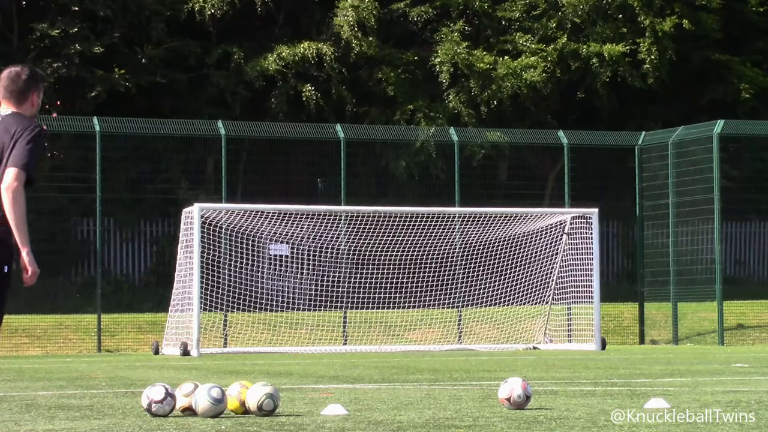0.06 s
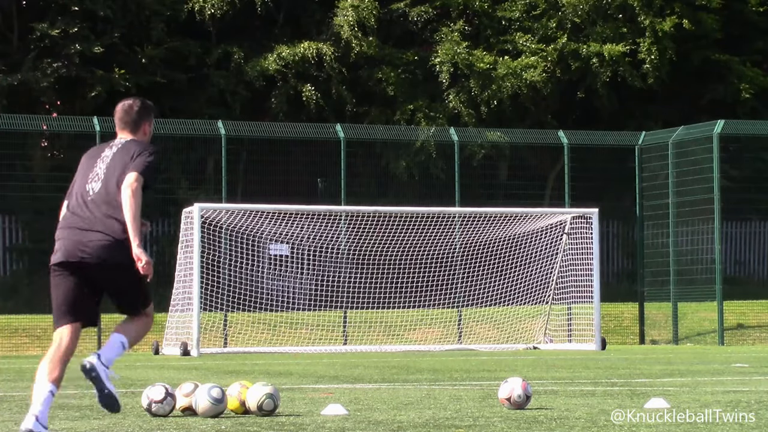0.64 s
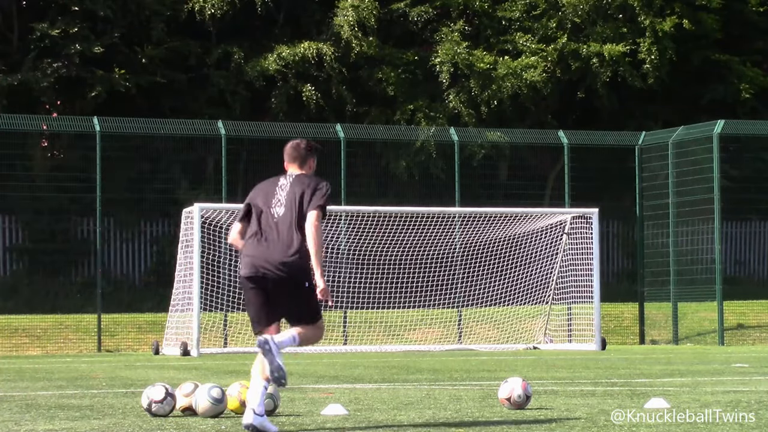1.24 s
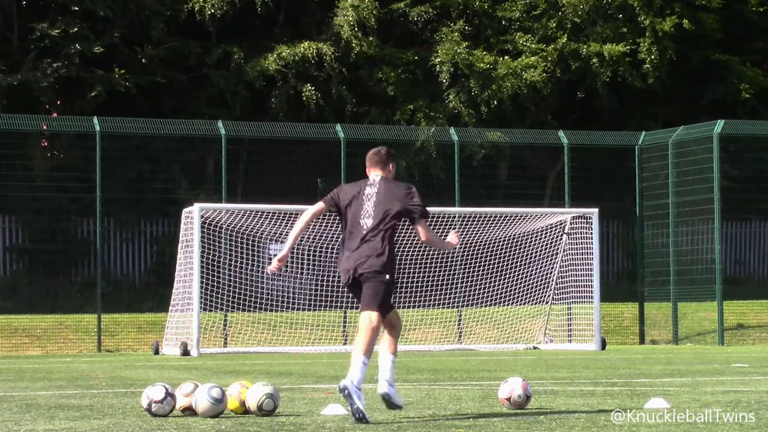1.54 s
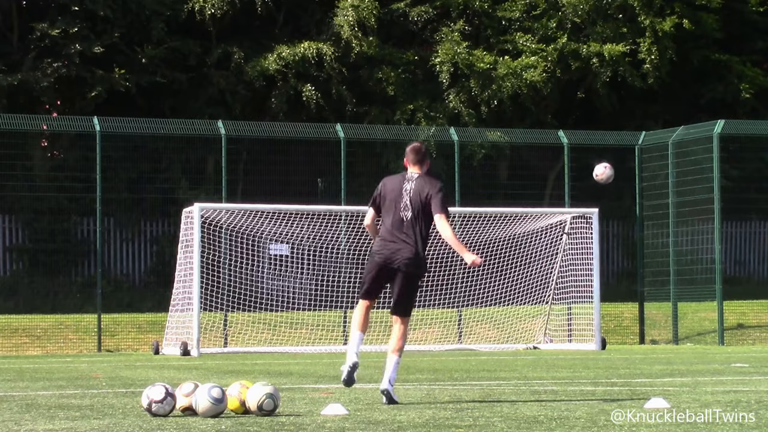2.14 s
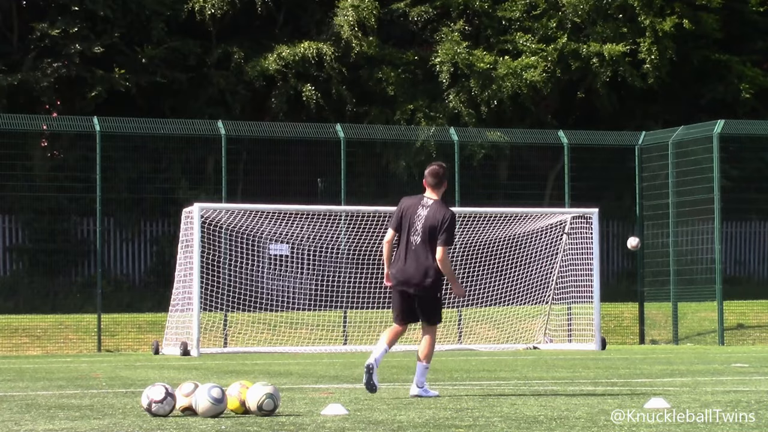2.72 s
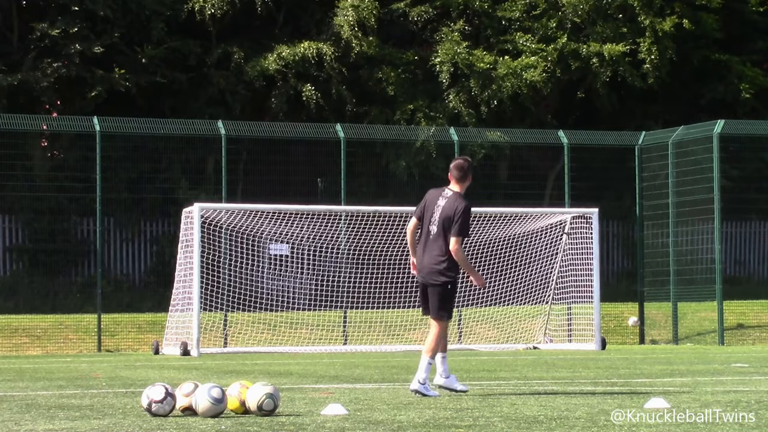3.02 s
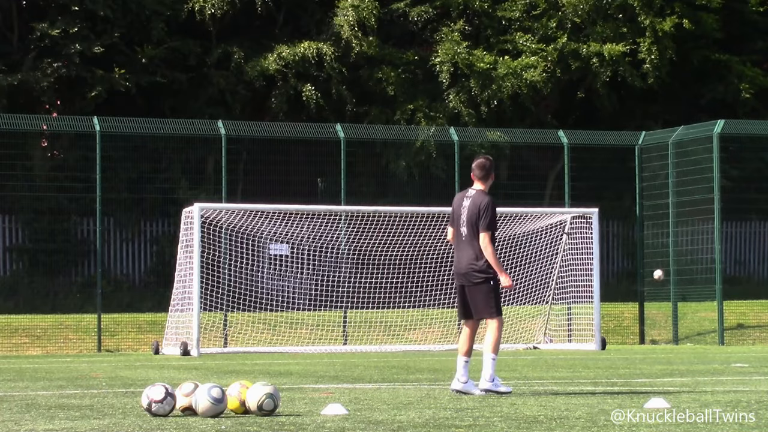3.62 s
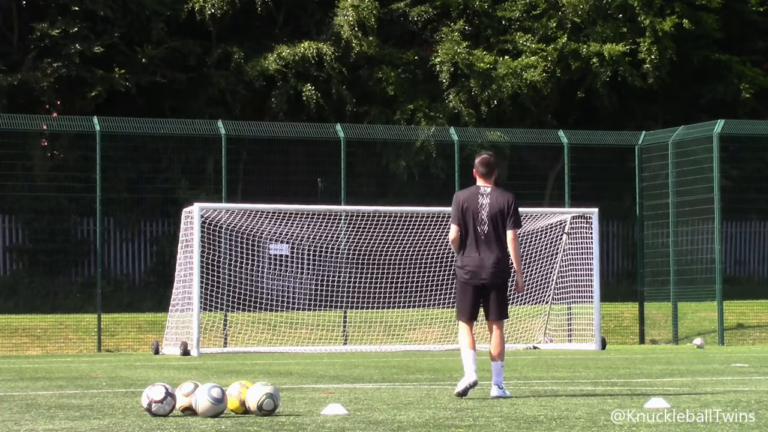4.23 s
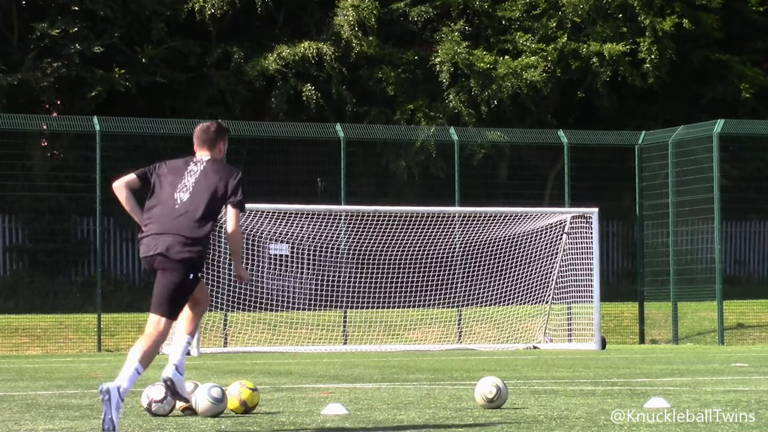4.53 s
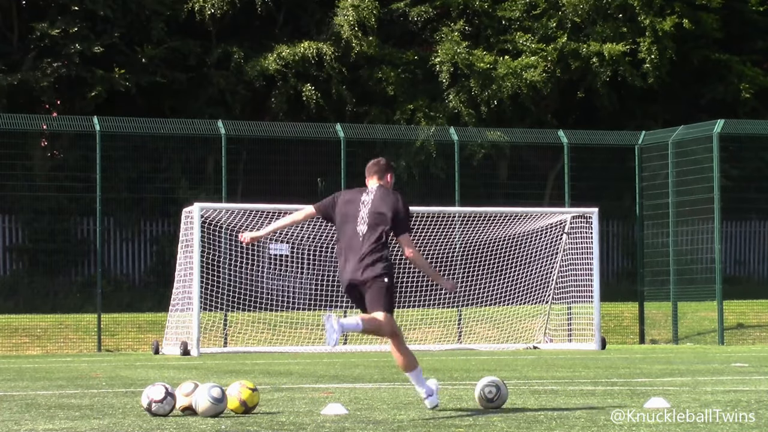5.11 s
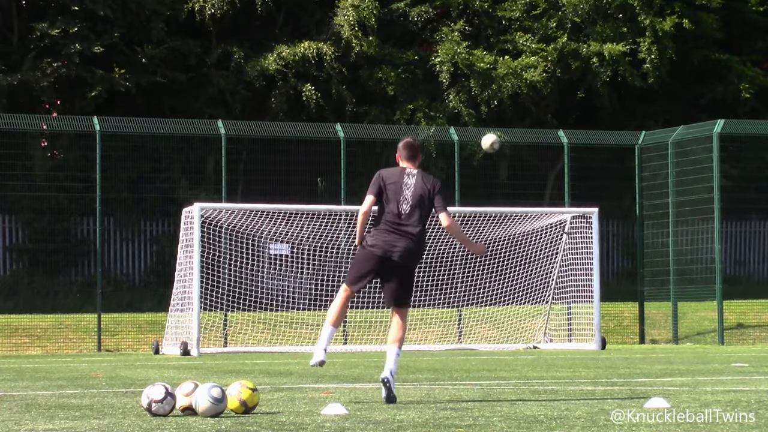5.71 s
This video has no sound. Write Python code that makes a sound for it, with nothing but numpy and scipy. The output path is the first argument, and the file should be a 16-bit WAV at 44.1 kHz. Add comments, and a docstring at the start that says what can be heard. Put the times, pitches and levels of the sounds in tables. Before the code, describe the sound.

A faint, steady wash of distant traffic and leaves runs throughout on an outdoor artificial pitch. A bird gives a few thin, very quiet chirps in the first half second or so. Soft footsteps with slight scuffs run up on the turf from about 1.2 to 1.8 seconds. At 1.9 seconds a boot strikes a football hard: a loud, sharp slap with a deep thud, followed by dull echoes. The ball bounces softly in the distance at 3.3 seconds, then thuds into a wire fence at 3.6. The fence rattles and rings lightly, much quieter than the kick, fading by about 4.5 seconds, with another soft bounce at 4.4. Quick steps return at about 4.9 seconds, and a second, equally hard kick lands at 5.4 with the same short echo. The action is centred in front of the microphone.

```python
"""An artificial football pitch ringed by a wire fence and trees. Two hard shots.
Each kick is a slap of boot on skin and a deep thud of shell and squeezed air, thrown back by the
surroundings. The first ball bounces, hits the fence and drops; the wires chatter in their clamps
for a second. Soft steps, a bird, leaves and far traffic lie beneath."""
import sys
import numpy as np
from scipy import signal
from scipy.fft import rfft, irfft
from scipy.io import wavfile

SR = 44100
rng = np.random.default_rng(int(sys.argv[2]) if len(sys.argv) > 2 else 0)


def store_wav(level_fs):
    """Save 16-bit WAV to argv[1]."""
    pcm = np.round(np.clip(np.atleast_2d(level_fs), -1, 1) * 32767)
    wavfile.write(sys.argv[1], SR, pcm.T.astype(np.int16))


N = 254016

# Far traffic and leaves. Each row: frequency in Hz, relative level in dB.
AMBIENCE_SPECTRUM = [(15, -64), (25, -40), (48, -18), (72, -5.5), (190, -2.5), (301, -4), (335, -6),
                     (545, -11.5), (911, -11), (1160, -12.5), (1370, -12.5), (2550, -22.5), (2760, -22.5),
                     (11300, -36.5), (16000, -46.5)]
# Their stereo width. Each row: frequency in Hz, side against mid in dB.
AMBIENCE_WIDTH = [(60, -17), (110, -17.5), (200, -15.5), (380, -8), (700, -7.5), (1290, -13), (2380, -7.5),
                  (4400, -7.5), (8120, -11.5), (15000, -9)]
# Each row: start in seconds, length in seconds, first, middle and last pitch in Hz, level in dB.
BIRD_SLURS = [(.085, .06, 4100, 4650, 5100, -66), (.115, .075, 3550, 3800, 3400, -63),
              (.135, .072, 3400, 3290, 2580, -59.5), (.51, 0.093, 2270, 2010, 2030, -61.5)]
# Each row: start in seconds, thump peak in dB, low-pass in Hz.
FOOTSTEPS = [(0.156, -44.5, 119), (1.164, -47, 483), (1.296, -46.5, 350), (1.662, -41, 416),
             (1.769, -43.5, 353), (4.273, -46, 139), (4.944, -45, 298), (5.136, -36.5, 457),
             (5.285, -36, 434)]
# Each row: start in seconds, level in dB, pitch in Hz.
SOLE_SCUFFS = [(1.25, -63, 1790), (1.675, -66.5, 3400)]
# Each row: delay in seconds, gain in dB, low-pass in Hz.
BALL_ECHOES = [(0.115, -34.5, 600), (.160, -26, 580), (0.229, -35, 190), (0.267, -30, 222),
               (.405, -35, 300), (.728, -30, 170)]
# Diffuse tail. Each row: frequency in Hz, gain in dB.
SCATTER_SPECTRUM = [(50, -20), (130, 8.5), (200, 15), (300, 0), (600, -2.5), (1500, 16.5), (3000, 17.5),
                    (9000, 5), (15000, -14)]
# The ball hits the mesh, bottoms out, is thrown back. Each row: start in seconds, level in dB.
MESH_JOLTS = [(3.581, -53), (3.643, -46), (3.745, -56)]
# Fence clamps and panels. Each row: frequency in Hz, width in Hz, relative gain in dB.
PANEL_MODES = [(1036, 26, 4.5), (1290, 250, -1), (1930, 580, 1.5), (2500, 300, -1.5), (2790, 82, 3.5),
               (3070, 104, 3), (4520, 200, 0.5), (5100, 140, -21), (5930, 81, 1.5), (6420, 73, -1),
               (7440, 150, 0.5), (8060, 260, -1), (8640, 500, -7.5), (9800, 700, -10)]
# Each row: frequency in Hz, relative level in dB, T60 in seconds.
WIRE_MODES = [(1040, -4, 0.91), (1057, 2.5, 0.65), (1080, -1, .6), (1830, -12, 0.3), (1960, -17, 0.53),
              (2070, -20, 0.27), (2390, -2, 0.17), (2690, -17, .3), (2796, -0.5, 0.15), (2860, -3, 0.33),
              (2890, -6, 0.38), (4520, -22, 0.48), (4570, -9.5, 0.25), (5830, -15, 0.084)]
# Wire on wire. Each row: frequency in Hz, gain in dB.
CLATTER_SPECTRUM = [(300, 5), (700, -14), (1100, 6.5), (2800, 6.5), (3800, 1), (5300, 2.5), (7000, -7),
                    (10000, -6), (15000, -11)]
# The recorder's dull top end, heard on the rattle. Each row: frequency in Hz, gain in dB.
RECORDER_TREBLE_SHELF = [(9800, -5), (11300, -9), (12300, -18), (14500, -16), (16000, -30)]
# Each row: start in seconds, level in dB, echo delay in seconds, echo gain in dB.
BALL_BOUNCES = [(3.301, -36, .108, -6), (3.583, -30.5, .088, -7.5), (4.423, -38, 0.19, -15)]
# Shell of a bouncing ball. Each row: frequency in Hz, gain in dB, rise in seconds.
BOUNCE_MODES = [(250, 0.5, 0.0023), (357, -8.5, 0.0028)]
# Shell of a kicked ball. Each row: frequency in Hz, gain in dB, rise in seconds.
KICK_MODES = [(384, -0.5, 0.0014), (299, -17, 0.0046)]
# Ball skin. Each row: frequency in Hz, width in Hz, relative gain in dB.
SKIN_MODES = [(995, 300, 13.5), (1880, 680, 10), (2200, 1600, 7.5), (3370, 520, -3), (7100, 6000, -3.5),
              (9350, 400, -32)]
# The boot swings through. Each row: start in seconds, tick in dB, knock in dB.
FOLLOW_TAPS = [(1.9382, -22, -37), (5.4168, -25, -22)]
# Each row: start in seconds, level in dB, slap pitch in Hz, gain of that pitch in dB,
# thud roll-off in Hz, cavity ring in dB.
SHOTS = [(1.9018, -1.5, 5630, 9, 665, -39), (5.3873, 0, 7000, 4.5, 797, -47)]


def from_db(db):
    """Decibels to gain."""
    return np.exp(np.asarray(db) * np.log(10) / 20)


def unit_rms(x):
    """Scale to rms 1."""
    return x / np.sqrt(np.mean(x ** 2) + 1e-20)


def clock():
    """Sample times in seconds."""
    return np.arange(N) / SR


def cut(x, hz, kind="low", order=2):
    """Butterworth low- or high-pass."""
    sos = signal.butter(order, np.clip(hz, 10, .45 * SR), kind, fs=SR, output="sos")
    return signal.sosfilt(sos, x + 1e-18)


def colour(x, spectrum):
    """Zero-phase filter through (Hz, dB) points."""
    hz, db = np.transpose(spectrum)
    bins_hz = np.maximum(np.fft.rfftfreq(N, 1 / SR), 1)
    return irfft(rfft(x) * from_db(np.interp(np.log(bins_hz), np.log(hz), db)), N)


def resonate(x, hz, width_hz):
    """Two-pole resonance, peak gain 1."""
    r = np.exp(-np.pi * width_hz / SR)
    feedback = [1, -2 * r * np.cos(2 * np.pi * hz / SR), r * r]
    return signal.lfilter(np.array([1, 0, -1]) * (1 - r * r) / 2, feedback, x + 1e-18)


def drift(rate_hz):
    """Straight lines between Gaussian draws."""
    return np.interp(clock() * rate_hz, np.arange(N), rng.standard_normal(N))


def delayed(x, delay_s):
    """Fractional delay."""
    return np.interp(clock() - delay_s, clock(), x, left=0)


def swell(t, rise_s):
    """Rises from t = 0 to 1 at rise_s, then dies."""
    u = np.clip(t / rise_s, 0, 40)
    return u * np.exp(1 - u)


def bell(u):
    """Gaussian hump, height 1."""
    return np.exp(-.5 * np.minimum(u * u, 100))


def knocks(per_s, spread_db=1.0):
    """Random contacts of uneven strength; rms 1."""
    chance, size = rng.random((2, N))
    hits = np.flatnonzero(chance < per_s / SR)
    signed = 2 * size[hits] - 1
    out = np.zeros(N)
    out[hits] = np.sign(signed) * from_db(spread_db * np.minimum(-np.log(np.abs(signed)), 4))
    return unit_rms(out)


def traffic_and_leaves(mid_db=-55):
    """Steady far noise, much the same in both ears."""
    mid, side = (unit_rms(colour(rng.standard_normal(N), AMBIENCE_SPECTRUM)) for _ in range(2))
    return from_db(mid_db) * (mid + colour(side, AMBIENCE_WIDTH) * [[1], [-1]])


def bird(waver=.036, waver_hz=900, blur_s=0.0049):
    """Thin, hoarse slurs, each one arc of pitch, blurred by the leaves."""
    out = np.zeros(N)
    for start_s, length_s, *pitches_hz, db in BIRD_SLURS:
        sung = (clock() > start_s) & (clock() < start_s + length_s)
        u = (clock()[sung] - start_s) / length_s
        arc_hz = np.polyval(np.polyfit([0, .5, 1], pitches_hz, 2), u)
        hz = arc_hz * (1 + waver * drift(waver_hz)[sung])
        out[sung] += from_db(db) * np.sin(np.pi * u) * np.sin(2 * np.pi * np.cumsum(hz) / SR)
    t = clock()[:SR // 10]
    leaves = rng.standard_normal(len(t)) * np.exp(-t / blur_s)
    return signal.oaconvolve(out, leaves / np.linalg.norm(leaves))[:N]


def steps(crunch_db=-33):
    """Boots land on turf: a padded thump and a little crunch of plastic grass."""
    out = np.zeros(N)
    grit = unit_rms(resonate(rng.standard_normal(N), hz=2300, width_hz=2600))
    turf = cut(rng.standard_normal(N), hz=90, kind="high", order=4)
    for start_s, db, lowpass_hz in FOOTSTEPS:
        t = clock() - start_s
        thump = cut(turf, lowpass_hz, order=4) * swell(t, rise_s=0.0041)
        crunch = from_db(crunch_db) * grit * swell(t, rise_s=0.013)
        out += from_db(db) * (thump / np.abs(thump).max() + crunch)
    return out


def scuffs(width_hz=900, rise_s=0.013):
    """A sole drags over the grass in the run-up."""
    blades = knocks(per_s=5000)
    return sum(from_db(db) * unit_rms(resonate(blades, hz, width_hz)) * swell(clock() - start_s, rise_s)
               for start_s, db, hz in SOLE_SCUFFS)


def swish(level_db=-67, lag_s=.022, rise_s=0.024):
    """The boot brushes the grass just after each shot."""
    blades = resonate(knocks(per_s=5000), hz=6500, width_hz=5500)
    envelope = sum(swell(clock() - start_s - lag_s, rise_s) for start_s, *_ in SHOTS)
    return from_db(level_db) * unit_rms(cut(blades, hz=8500, order=6)) * envelope


def surroundings(x, scatter_db=-29, near_s=.01, near_db_per_s=650, linger_db_per_s=11,
                 trees_s=0.24, trees_spread_s=0.045):
    """Dull echoes and a tail: turf and goal answer at once, the fence lingers, trees send one wave."""
    echoes = sum(from_db(db) * delayed(cut(x, hz), delay_s) for delay_s, db, hz in BALL_ECHOES)
    t = clock()
    near = from_db(7 - near_db_per_s * np.clip(t - near_s, 0, 1))
    linger = from_db(-9 - linger_db_per_s * t)
    trees = from_db(-5.5) * bell((t - trees_s) / trees_spread_s)
    fade = np.sqrt(near ** 2 + linger ** 2 + trees ** 2) * (t > near_s)
    tail = colour(rng.standard_normal(N), SCATTER_SPECTRUM) * fade / np.linalg.norm(fade)
    return echoes + from_db(scatter_db) * signal.fftconvolve(x, tail)[:N]


def fence_envelopes(hit_s=3.582, sink_s=.14, cut_s=4.51, attack_s=0.0032, cut_fade_s=0.025,
                    fall_db_per_s=25.5, dulling_db_per_s=25, treble_attack_s=0.012):
    """The mesh shakes as the ball sinks in, then softens and dulls; the last of the sound is cut off."""
    t = clock() - hit_s
    dying_s = np.maximum(t - sink_s, 0)
    sway = from_db(-40 - fall_db_per_s * dying_s) * np.clip(t / attack_s, 0, 1)
    sway *= np.exp(-np.maximum(clock() - cut_s, 0) / cut_fade_s)
    jolts = sum(from_db(db) * swell(clock() - start_s, rise_s=0.012) for start_s, db in MESH_JOLTS)
    treble = sway * from_db(4 - dulling_db_per_s * dying_s) * np.clip(t / treble_attack_s, 0, 1)
    return sway + jolts, treble


def fence(knocks_per_s=1900, clump_db=2.0, clatter_db=-12, wires_db=-8, split_hz=4800):
    """Wires chatter against their clamps in clumps, ring the panels and sing on afterwards."""
    shaking, treble = fence_envelopes()
    per_s = knocks_per_s * from_db(clump_db * drift(rate_hz=90))
    mesh = knocks(per_s)
    panels = sum(from_db(db) * resonate(knocks(per_s), hz, width_hz) for hz, width_hz, db in PANEL_MODES)
    clatter = from_db(clatter_db) * colour(mesh, CLATTER_SPECTRUM)
    chatter = unit_rms(colour(panels + clatter, RECORDER_TREBLE_SHELF))
    low = colour(chatter, [(split_hz / 2, 0), (split_hz, -3), (split_hz * 2, -24)])
    rattle = shaking * low + treble * (chatter - low)
    wires = sum(from_db(db) * unit_rms(resonate(mesh * shaking, hz, np.log(1000) / (np.pi * t60_s)))
                for hz, db, t60_s in WIRE_MODES)
    return rattle + from_db(wires_db) * np.std(rattle) * unit_rms(wires)


def shell(t, modes):
    """A few heavily damped swings of the ball's shell."""
    return sum(from_db(db) * np.sin(2 * np.pi * hz * t) * swell(t, rise_s) for hz, db, rise_s in modes)


def squeeze(t, hz=127, deepest_s=0.00932, spread_s=0.0049, grip_s=0.0011):
    """The air inside is squeezed and swings back: the deep part of a thud."""
    offset_s = t - deepest_s
    return -np.cos(2 * np.pi * hz * offset_s) * bell(offset_s / spread_s) * np.clip(t / grip_s, 0, 1)


def bounces(squeeze_db=-1):
    """The far ball lands: soft thuds, each with a low echo from close behind it."""
    out = np.zeros(N)
    for start_s, db, echo_s, echo_db in BALL_BOUNCES:
        t = clock() - start_s
        landing = from_db(db) * (shell(t, BOUNCE_MODES) + from_db(squeeze_db) * squeeze(t))
        out += landing + from_db(echo_db) * delayed(cut(landing, hz=220), echo_s)
    return out


def cavity(t, hz=1054, t60_s=0.13):
    """Thin ring of the air inside the ball."""
    age_s = np.clip(t, 0, 1)
    return np.sin(2 * np.pi * hz * age_s) * np.exp(-np.log(1000) * age_s / t60_s)


def thud(t, contact_s=0.01364, snap_s=0.00062):
    """The shell rings, the ball flattens, and the dent snaps out as it leaves the boot."""
    u = (t - contact_s) / snap_s
    release = (1 - u * u) * bell(u)
    return from_db(-3) * shell(t, KICK_MODES) + from_db(-9.5) * squeeze(t) + from_db(-8.5) * release


def slap(t, pitch_hz, pitch_db, pitch_width_hz=1100, scuff_db=-30, edge_db=-23):
    """Boot meets skin: a crack pitched by the spot that hits, and a scuff as the ball flattens."""
    click = np.zeros(N)
    click[np.searchsorted(t, 0)] = 1
    blow = click + from_db(scuff_db) * rng.standard_normal(N) * swell(t, rise_s=0.0019)
    modes = [*SKIN_MODES, (pitch_hz, pitch_width_hz, pitch_db)]
    skin = sum(from_db(db) * resonate(blow, hz, width_hz) for hz, width_hz, db in modes)
    crack = cut(skin, hz=9500, order=6) + from_db(edge_db) * skin
    return crack / np.linalg.norm(crack)


def kicks(slap_db=-3.5):
    """Slap, thud and ring of each shot, then the tap of the follow-through."""
    out = np.zeros(N)
    for start_s, db, pitch_hz, pitch_db, dull_hz, ring_db in SHOTS:
        t = clock() - start_s
        body = colour(thud(t), [(35, -8), (70, 0), (dull_hz * 0.75, 0), (dull_hz * 1.11, -10)])
        crack = from_db(slap_db) * slap(t, pitch_hz, pitch_db)
        out += from_db(db) * (crack + body + from_db(ring_db) * cavity(t))
    for start_s, tick_db, knock_db in FOLLOW_TAPS:
        t = clock() - start_s
        tick = cut(slap(t, pitch_hz=2500, pitch_db=-11), hz=3300, order=3)
        out += from_db(tick_db) * tick - from_db(knock_db) * shell(t, KICK_MODES)
    return out


def scene(side_db=-32, side_delay_s=.011):
    """Play is straight ahead; echoes, fence and bird spread a little."""
    ball = cut(kicks() + bounces(), hz=45, kind="high")   # too small to radiate deep bass
    far = surroundings(ball) + fence() + bird()
    side = from_db(side_db) * delayed(far, side_delay_s) * [[1], [-1]]
    return ball + steps() + scuffs() + swish() + far + side + traffic_and_leaves()


def record(dry, cutoff_hz=15800):
    """Steep low-pass."""
    return signal.sosfilt(signal.ellip(10, .1, 80, cutoff_hz, fs=SR, output="sos"), dry)


dry = scene()
out = record(dry)
store_wav(out)
```